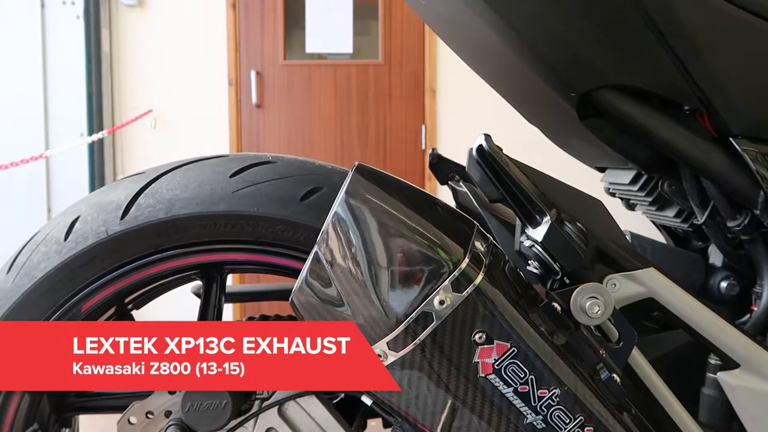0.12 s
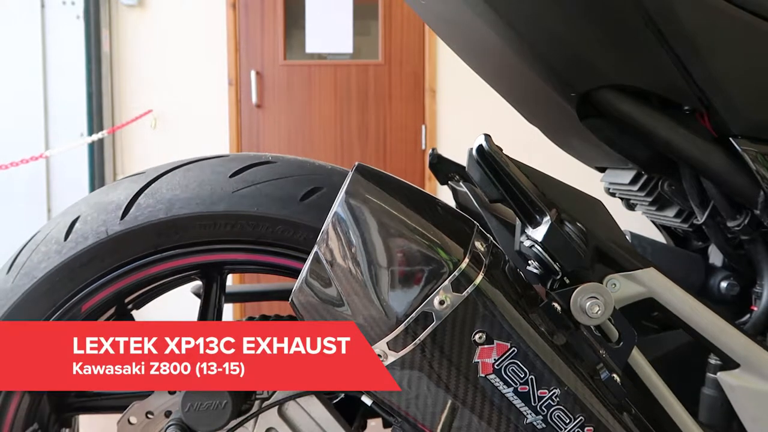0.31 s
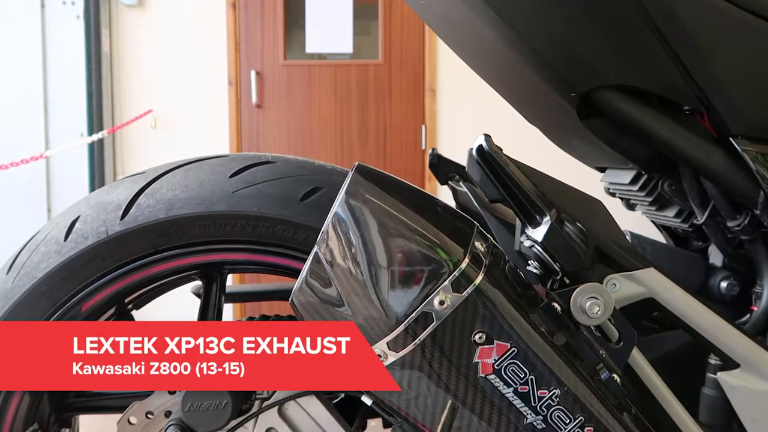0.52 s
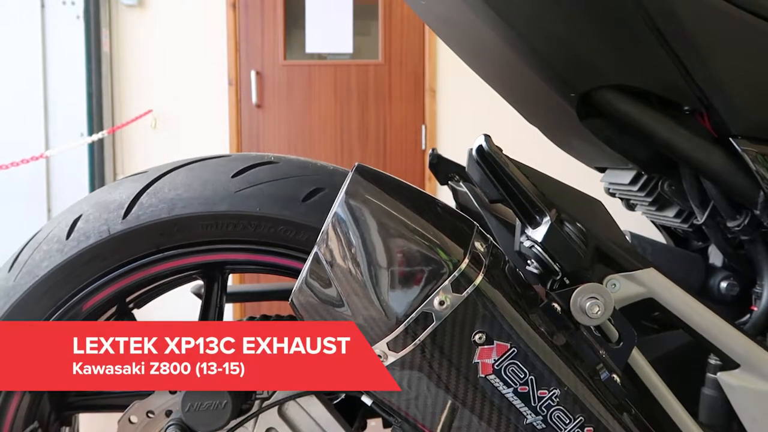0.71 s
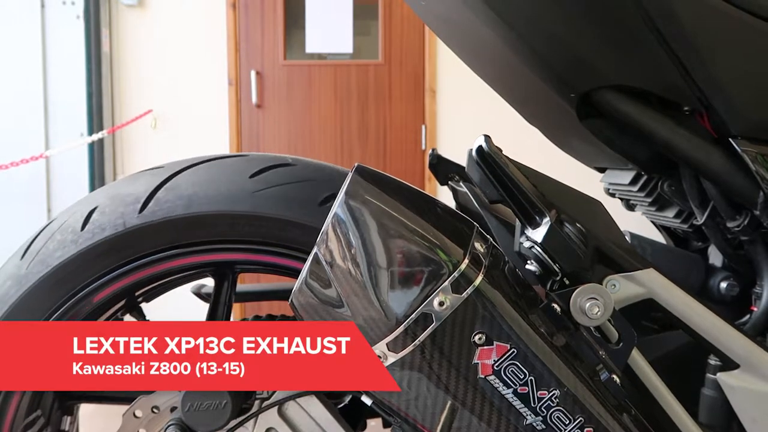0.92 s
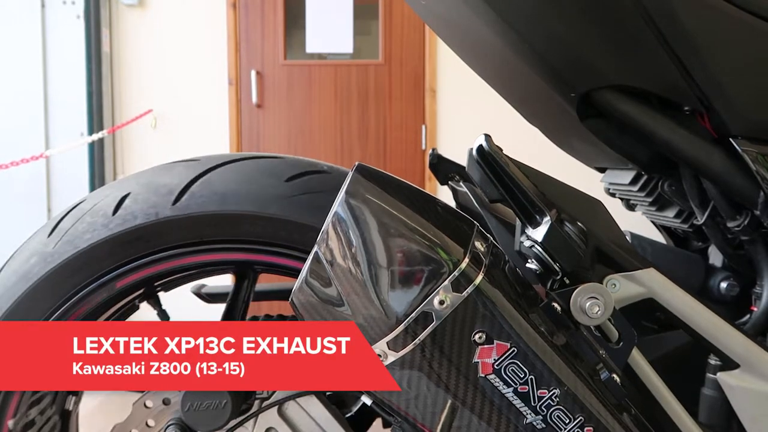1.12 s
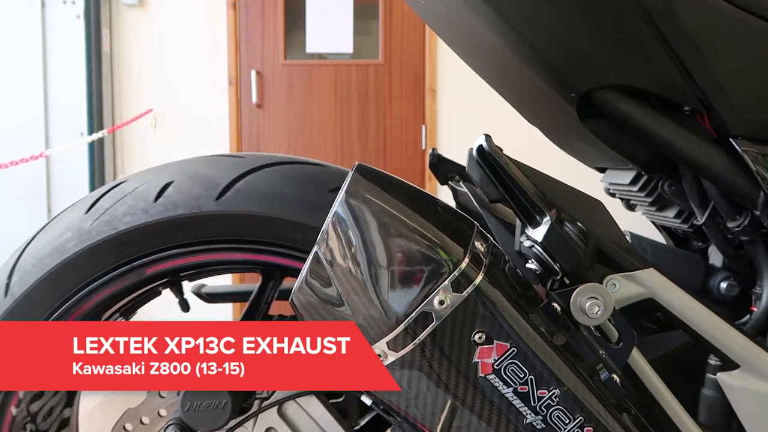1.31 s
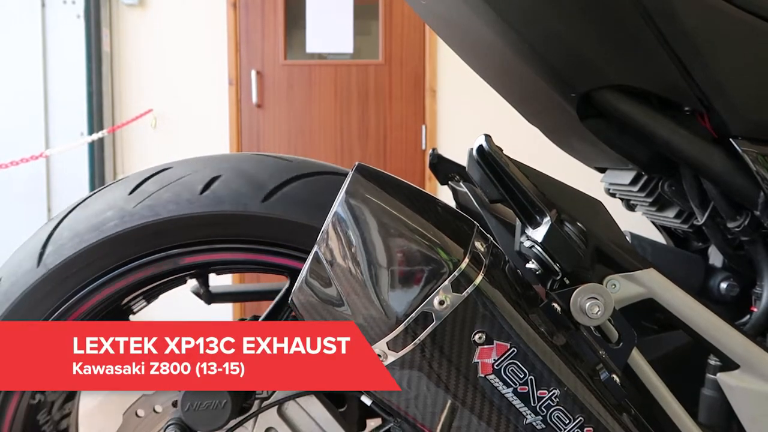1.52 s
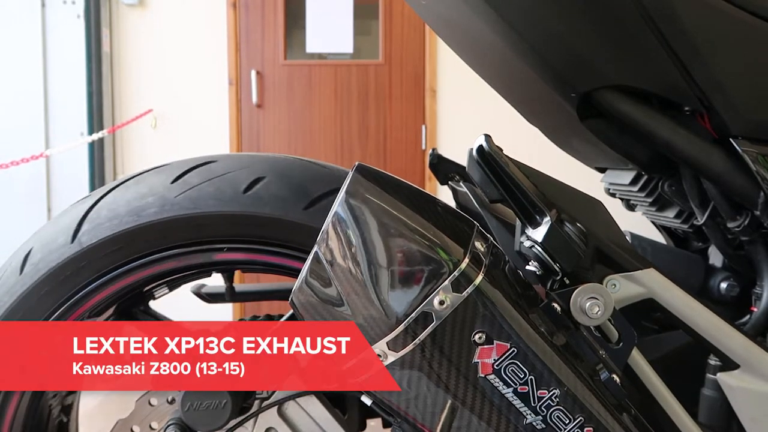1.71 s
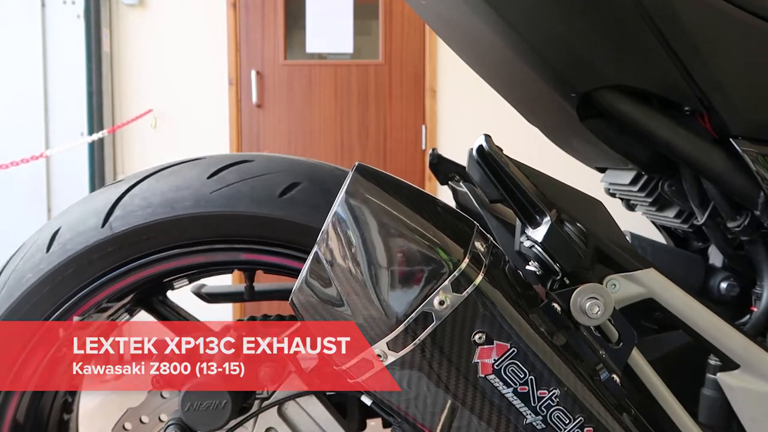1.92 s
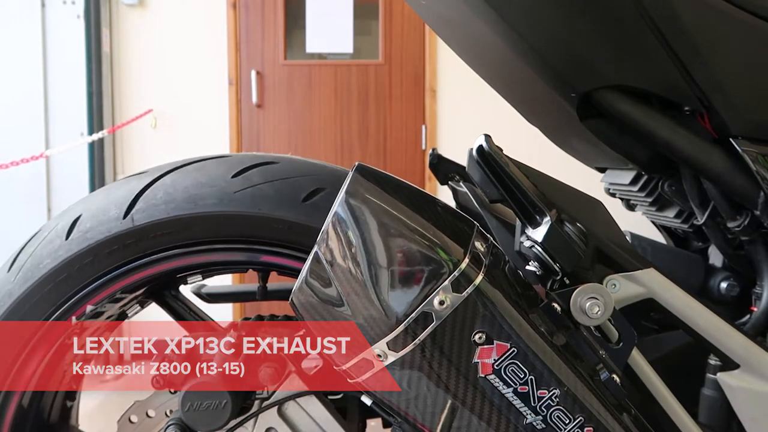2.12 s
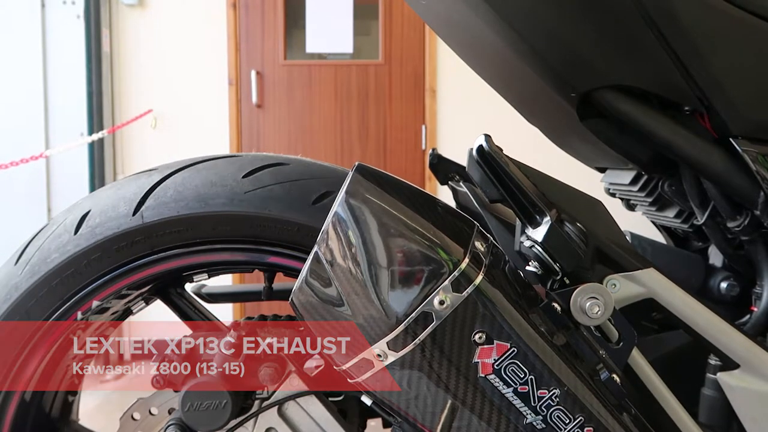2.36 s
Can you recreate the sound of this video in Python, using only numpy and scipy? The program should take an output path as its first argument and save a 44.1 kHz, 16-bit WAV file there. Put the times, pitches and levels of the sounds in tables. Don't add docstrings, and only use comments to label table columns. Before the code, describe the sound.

Motorcycle exhaust heard very close in a small hard room: uneven throbbing idle, one sudden loud rev climbing to a raspy peak, then a smooth falling howl and a return to soft lumpy idle.

```python
import sys
import numpy as np
from scipy import signal
from scipy.fft import rfft, irfft, next_fast_len
from scipy.io import wavfile
from scipy.ndimage import uniform_filter1d

SR = 44100
rng = np.random.default_rng(int(sys.argv[2]) if len(sys.argv) > 2 else 0)


def how_loud(loudness_db):
    steps = np.asarray(loudness_db, float) / 20
    return 10 ** steps


def persist_wave(psi):
    counts = np.round(np.clip(psi, -1, 1) * 32767).astype(np.int16)
    wavfile.write(sys.argv[1], SR, np.atleast_2d(counts).T)


N = 112455

# [t/s, level/dB rms]
BOOM = [(0, -41), (.6, -36), (.72, -45.5), (1.05, -62.5), (1.9, -63.5), (2.15, -44.5), (2.55, -42)]
# [t/s, level/dB]
RUMBLE = [(0, -31), (.13, -40.5), (.25, -34.5), (.33, -35.5), (.45, -29.5), (.58, -36), (.68, -23.5),
          (.85, -34.5), (1.05, -34.5), (1.65, -34), (2.1, -30), (2.3, -31.5), (2.55, -34)]
# [f/Hz, width/Hz, level/dB]
DRONES = [(45, 32, -7), (834, 49, 7), (1040, 30, -7)]
# [t/s, level/dB]
GAS_FLOW = [(0, -59), (.56, -58.5), (.64, -47.5), (.72, -46), (.78, -30), (.81, -29), (.9, -25.5),
            (.95, -30.5), (.99, -37.5), (1.08, -42.5), (1.19, -40), (1.3, -35), (1.4, -40.5), (1.52, -40.5),
            (1.76, -50), (1.96, -52.5), (2.1, -61.5), (2.55, -61)]
# [f/Hz, level/dB per Hz]
HISS_MID = [(1200, 4), (1500, -0.5), (2000, -3.5), (2500, -10.5), (3200, -7.5), (4500, -11.5),
            (6500, -23.5), (8500, -51.5)]
# [f/Hz, level/dB per Hz]
HISS_SIDE = [(1200, 15), (1500, -15), (2000, 1), (3000, -6), (4300, -2), (5200, -18), (8150, -24),
             (12000, -45)]
# [f/Hz, width/Hz, level/dB]
SHELL = [(2897, 33, 15.5), (3870, 50, 4)]
# [t/s, firings so far]
IDLE = [(-.0015, 0), (.0945, 5), (.1805, 9), (.223, 11), (.2825, 14), (.369, 18), (.477, 23), (.584, 28),
        (.6035, 29), (.620, 30), (.635, 31), (.6475, 32), (.659, 33), (.6695, 34), (.6895, 36)]
# [t/s, rate/firings per s]
REV_SPEED = [(.69, 115), (.72, 144.4), (.782, 209), (.812, 239), (.858, 286.5), (.902, 331), (.946, 358.7),
             (.978, 364.4), (1.01, 357), (1.08, 334.6), (1.188, 303), (1.334, 262.7), (1.54, 208.6),
             (1.762, 158), (1.962, 116.8), (2.078, 98.3)]
# [t/s, firings since settling began]
SETTLE = [(2.146, 0), (2.193, 4), (2.228, 7), (2.263, 10), (2.345, 16), (2.42, 21), (2.453, 23),
          (2.522, 27), (2.56, 29)]
# [t/s, level/dB]
LOPE = [(0, -24), (.02, -24), (.035, -14.5), (.08, -15.5), (.105, -26), (.165, -28), (.18, -16),
        (.285, -15), (.305, -26), (.35, -27), (.368, -16.5), (.46, -17), (.5, -24), (.54, -13.5),
        (.59, -13.5), (.604, -4.5), (.62, -2.2), (.635, -3), (.647, -4), (.659, -1), (.67, -7), (.68, -3.5),
        (.7, -4.5)]
# [t/s, level/dB, unevenness between cylinders]
PUSH = [(0.742, -7, 0.13), (0.802, -9.5, .15), (0.898, -13.5, 0.4), (0.968, -15, 0.72), (1.019, -15.5, 0.3),
        (1.2, -14.5, 0.83), (1.4, -13, 0.62), (1.602, -14.5, 0.63), (1.8, -18, 0.55), (1.999, -19, 0.36),
        (2.1, -21, 0.2), (2.129, -17.5, 0.067), (2.146, -10, 0.19), (2.17, -21.5, .1), (2.193, -19, 0.083),
        (2.215, -17, 0.2), (2.241, -32, 0.2), (2.25, -11.5, .1), (2.264, -12.5, 0.1), (2.29, -19.5, 0.054),
        (2.32, -25.5, .1), (2.345, -17.5, 0.13), (2.37, -37, 0.054), (2.405, -27, 0.07),
        (2.421, -17, 0.043), (2.453, -17.5, 0.052), (2.49, -23, 0.061), (2.51, -31, 0.12),
        (2.522, -18.5, .1), (2.55, -16.5, 0.1)]
# [t/s, spread/dB]
ROUGH = [(0, 1.2), (.55, 1.2), (.6, .3), (.7, .4), (.8, 1.6), (.95, 1.5), (1.05, .6), (1.65, .8),
         (1.85, 1.8), (2.15, 2), (2.55, 1.5)]
CYLINDER_DB = [.6, -.3, -.3, 0.]
CYLINDER_LATE = [0., .13, .015, .12]
# [t/s, level/dB]
POPS = [
    (.985, -12),
    (2.228, -18),
]
# [t/s, level/dB]
FRONT = [(0, -15), (.58, -12), (.66, -6), (.78, 8), (.95, 8.5), (1.05, -8.5), (1.3, -1), (1.7, -6),
         (2., -3), (2.15, -16.5), (2.219, -20), (2.228, 1), (2.237, -17.5), (2.55, -20)]
# [f/Hz, width/Hz, level/dB]
CAN = [(511.5, 109, 2), (563, 323, 5.5), (716, 158, 7), (980, 90, 0), (1068, 143, -2.5), (1329, 85, -7.5),
       (1604, 136, -10.5), (1810, 240, -30.5), (2961, 160, -16.5)]
# [t/s, level/dB rms]
PUMP = [(.7, -55), (.78, -38), (.95, -27.5), (1.1, -33), (1.35, -25.5), (1.5, -20.5), (1.6, -24),
        (1.76, -27), (1.85, -35), (1.95, -33), (2.12, -48.5)]
# [delay t/s, level/dB, sign]
ECHOES = [(.0068, -9, 1), (.0105, -16, 1), (.0235, -13, -1), (.047, -14, 1)]
# [f/Hz, width/Hz, level/dB]
RINGS = [(123.7, 21, 5), (196.9, 25, 0), (213.5, 14, 1.5), (269.1, 14, 6), (313.5, 5.5, 7.5),
         (334.6, 12, 3.5), (377.6, 27, -3), (407, 57, -2), (483.9, 5.5, 5.5), (608.4, 16, 2)]

LEAD = -12
LEAN = .5


def rms_one(x):
    return x / np.sqrt(np.mean(x ** 2) + 1e-20)


def in_time(rows, column=1):
    rows = np.array([r[:column + 1] for r in rows if len(r) > column])
    return np.interp(np.arange(N) / SR, rows[:, 0], rows[:, column])


def cut(x, hz, kind, order=2):
    return signal.sosfilt(signal.butter(order, hz, kind, fs=SR, output="sos"), x)


def highpass_in_phase(x, hz):
    return signal.sosfiltfilt(signal.butter(2, hz, "high", fs=SR, output="sos"), x)


def resonance(x, hz, width_hz):
    r = np.exp(-np.pi * width_hz / SR)
    gain = (1 - r * r) / 2
    return signal.lfilter([gain, 0, -gain], [1, -2 * r * np.cos(2 * np.pi * hz / SR), r * r], x + 1e-18)


def ringing(x, modes):
    return sum(how_loud(db) * resonance(x, hz, width_hz) for hz, width_hz, db in modes)


def bands(spectrum, white):
    patchy_db, hold = .7, 1500
    hz, db = np.transpose(spectrum)
    edges = 1250 * 2 ** np.arange(0, 3.8, 1 / 3)
    points = np.arange(0, N + hold, hold)
    out = 0
    for k, (low, high) in enumerate(zip(edges, edges[1:])):
        flicker = np.interp(np.arange(N), points, rng.standard_normal(len(points)))
        level_db = np.interp(np.log(low * high) / 2, np.log(hz), db) + patchy_db * flicker
        out = out + how_loud(level_db) * cut(white[k % 2], [low, high], "band", order=3)
    return rms_one(out)


def boom():
    return how_loud(in_time(BOOM)) * rms_one(cut(rng.standard_normal(N), [79, 150], "band"))


def rumble():
    white = rng.standard_normal(N)
    low = rms_one(cut(white, [170, 520], "band", order=3))
    return how_loud(in_time(RUMBLE)) * (low + ringing(white, DRONES))


def room(x):
    room_db, t60_s, wall_cut_hz = -19.5, .42, 1500
    size = next_fast_len(N + SR)
    hz = np.arange(size // 2 + 1) * SR / size
    spectrum, out = rfft(x, size), []
    for lags in rng.uniform(.015, .045, (2, 10)):
        returns = 0
        for k, s in enumerate(lags):
            loss_db = -60 * s / t60_s * (0.5 + hz / wall_cut_hz)
            loop = how_loud(loss_db) * np.exp(-2j * np.pi * hz * s)
            returns = returns + (-1) ** k * loop / (1 - loop)
        out.append(irfft(spectrum * returns, size)[:N])
    return how_loud(room_db) * np.array(out)


def whir(rate):
    whir_db, db_per_octave, full_hz, side_db = -56, 17, 225, 6.5
    octaves = np.log2(np.minimum(uniform_filter1d(rate, size=2000) / full_hz, 1))
    noise = rms_one(cut(rng.standard_normal((2, N)), [3280, 6900], "band"))
    return noise * how_loud(whir_db + db_per_octave * octaves) * how_loud([[0], [side_db]])


def hiss(count):
    mid_db, side_db, beat, shared = -2, 1, 0.12, 0.23
    white = rng.standard_normal((2, 2, N))
    mid = bands(HISS_MID, white[0]) + ringing(white[0, 0], SHELL)
    side = bands(HISS_SIDE, shared * white[0] + np.sqrt(1 - shared ** 2) * white[1])
    gain = how_loud(in_time(GAS_FLOW)) * (1 + beat * np.cos(2 * np.pi * count))
    return gain * mid * how_loud(mid_db), gain * side * how_loud(side_db)


def crank():
    count = in_time(IDLE)
    start, end = int(IDLE[-1][0] * SR), int(REV_SPEED[-1][0] * SR)
    count[start:] = count[start] + np.cumsum(in_time(REV_SPEED)[start:]) / SR
    settled = np.round(count[int(SETTLE[0][0] * SR)] - .4)
    settling = [(end / SR, count[end])] + [(s, settled + n) for s, n in SETTLE]
    count[end:] = in_time(settling)[end:]
    return count


def firings(count):
    jitter = .004
    k = np.arange(1, int(count[-1]) + 1)
    at = np.interp(k, count, np.arange(N)).astype(int)
    chance = rng.standard_normal((600, 2))[k]
    uneven, rough_db = in_time(PUSH, column=2)[at], in_time(ROUGH)[at]
    db = in_time(LOPE + PUSH)[at] + uneven * np.take(CYLINDER_DB, k % 4) + rough_db * chance[:, 0]
    late = uneven * np.take(CYLINDER_LATE, k % 4) + jitter * rough_db * chance[:, 1]
    when = np.interp(k + late, count, np.arange(N))
    when = np.r_[when - LEAD, [s * SR for s, _ in POPS]]
    db = np.r_[db, [d for _, d in POPS]]
    i, clicks = np.minimum(when.astype(int), N - 2), np.zeros(N)
    np.add.at(clicks, i, how_loud(db) * (1 - when % 1))
    np.add.at(clicks, i + 1, how_loud(db) * (when % 1))
    return clicks


def swings(clicks, hz, spread_s, lean):
    t = np.arange(-200, 201) / SR
    swing = np.exp(-(t / spread_s) ** 2 / 2) * np.cos(2 * np.pi * hz * t + lean)
    return np.convolve(clicks, swing, "same")


def silencer(clicks, rate):
    fast = np.clip((rate - 80) / (150 - 80), 0, 1)
    slow_pulse = swings(clicks * (1 - fast), 325, .0011, LEAN)
    fast_pulse = swings(clicks * fast, 475, .00073, .25)
    return highpass_in_phase(slow_pulse + fast_pulse, 85)


def can(clicks):
    front = np.roll(clicks, LEAD) * how_loud(in_time(FRONT) + 20.5)
    out = 0
    for k, (hz, width_hz, db) in enumerate(CAN):
        softened = resonance(front, hz, 2 * width_hz)
        out = out + (-1) ** k * how_loud(db) * resonance(softened, hz, width_hz)
    return out


def pump(count):
    return np.sqrt(2) * how_loud(in_time(PUMP)) * np.cos(2 * np.pi * count + LEAN)


def thump(clicks, rate):
    hz, width_hz, thump_db, fades_hz = 51.4, 29, 21, 50
    slow = clicks * np.minimum(fades_hz / rate, 1) ** 3
    return how_loud(thump_db) * resonance(resonance(slow, hz, width_hz), hz, width_hz)


def exhaust(clicks, count, rate):
    rings_db = -2
    pulse = silencer(clicks, rate) + can(clicks) + pump(count)
    out = pulse + thump(clicks, rate)
    for s, db, sign in ECHOES:
        lag = int(s * SR)
        out[lag:] += sign * how_loud(db) * pulse[:N - lag]
    return out + how_loud(rings_db) * ringing(pulse, RINGS)


def scene():
    side_cut_hz, side_db, side_room_db, side_lag = 1395, 5, -16, 4
    count = crank()
    rate = np.gradient(count) * SR
    pipe = exhaust(firings(count), count, rate) + rumble() + boom()
    wet = room(pipe)
    mid, side = hiss(count) + whir(rate)
    mid = mid + pipe + wet[0]
    treble = highpass_in_phase(pipe + wet[0] + how_loud(side_room_db) * wet[1], side_cut_hz)
    side = side + how_loud(side_db) * np.roll(treble, side_lag)
    return np.array([mid + side, mid - side])


def roll_off(x):
    return signal.sosfilt(signal.butter(12, 15700, fs=SR, output="sos"), x)


def record(dry):
    mix = np.clip(dry, -1, 1)
    return roll_off(mix)


dry = scene()
out = record(dry)
persist_wave(out)
```